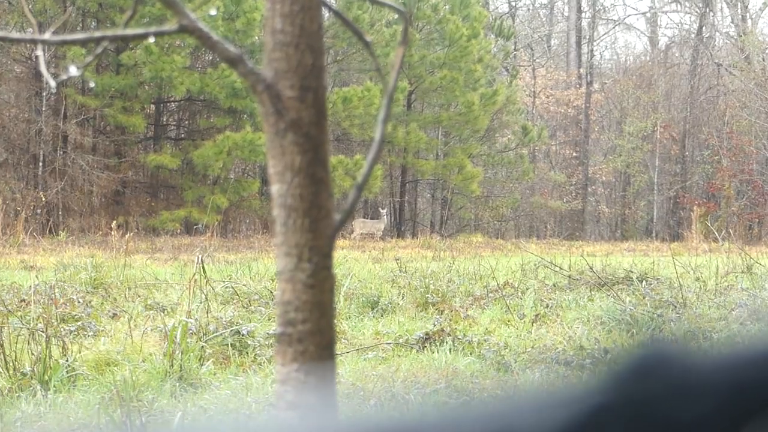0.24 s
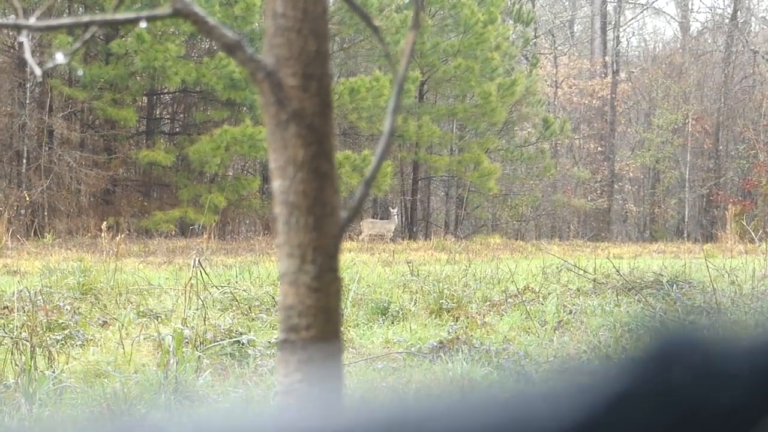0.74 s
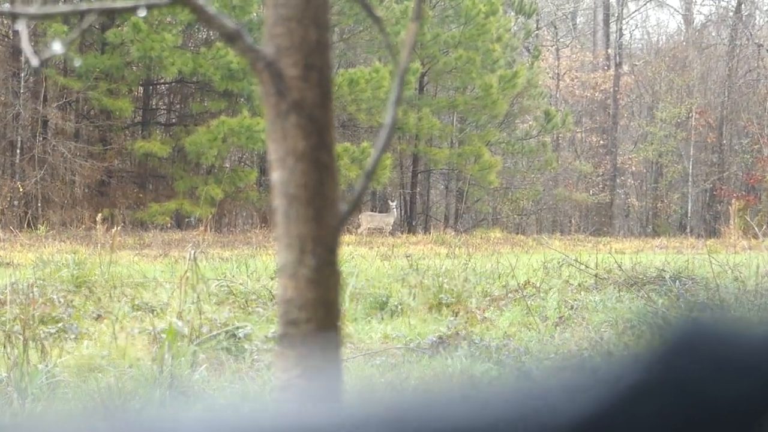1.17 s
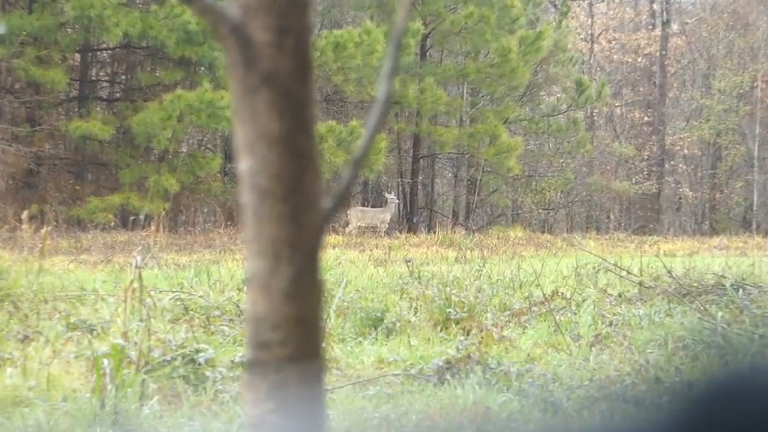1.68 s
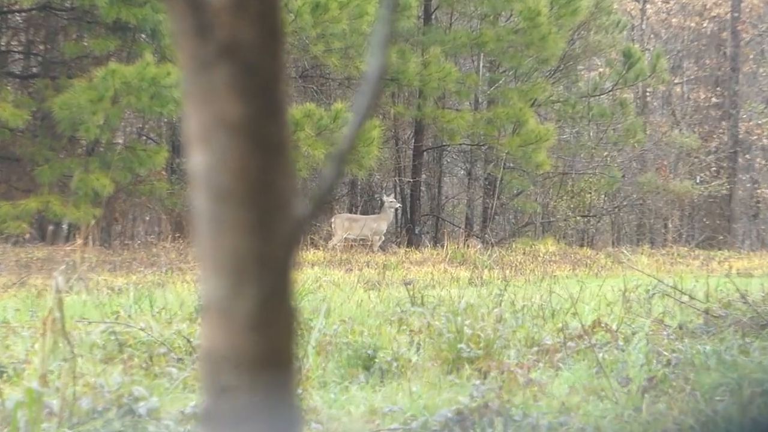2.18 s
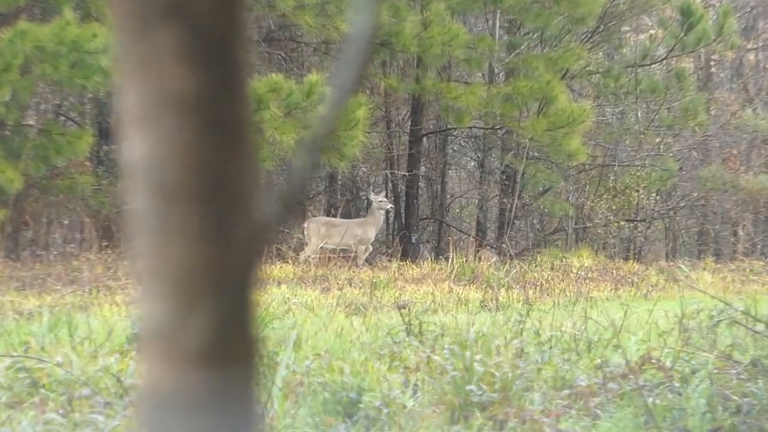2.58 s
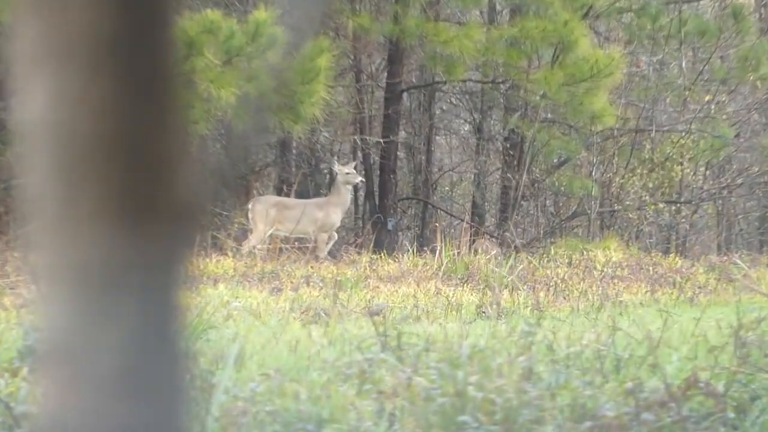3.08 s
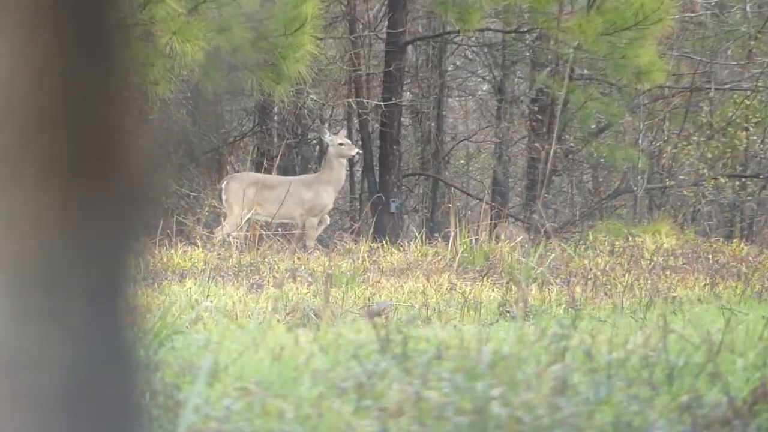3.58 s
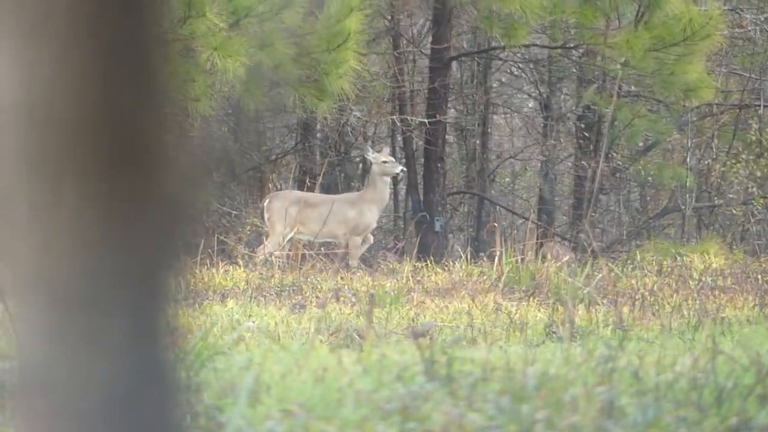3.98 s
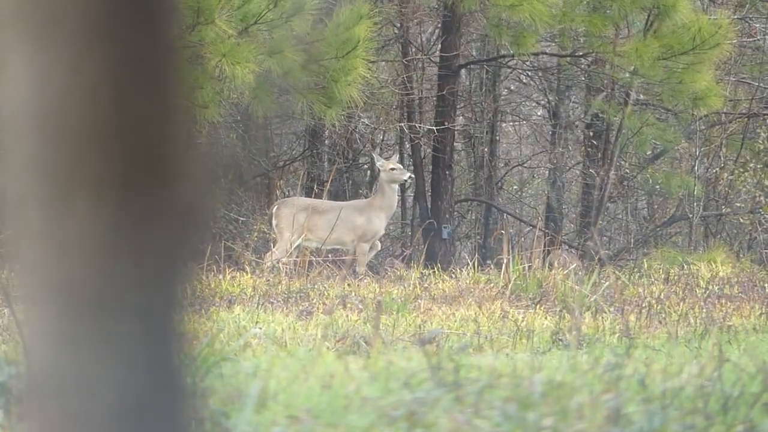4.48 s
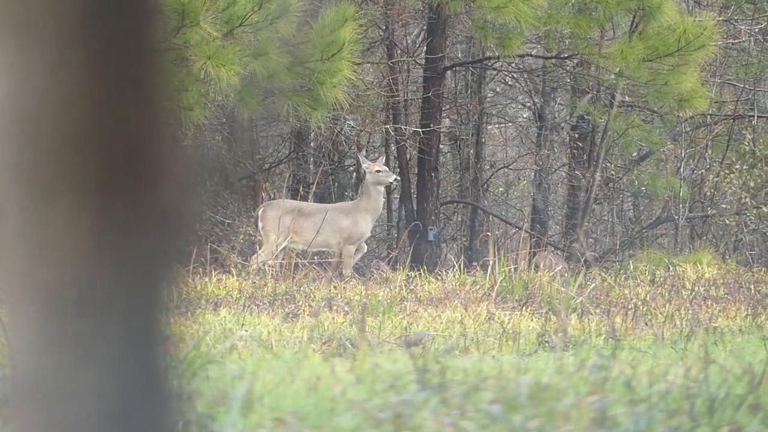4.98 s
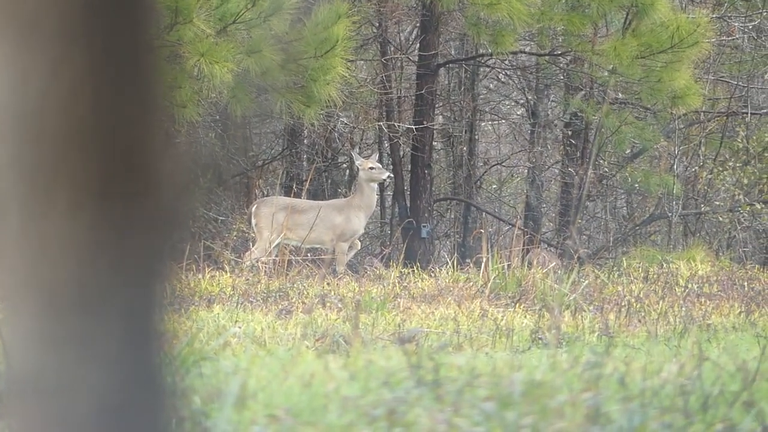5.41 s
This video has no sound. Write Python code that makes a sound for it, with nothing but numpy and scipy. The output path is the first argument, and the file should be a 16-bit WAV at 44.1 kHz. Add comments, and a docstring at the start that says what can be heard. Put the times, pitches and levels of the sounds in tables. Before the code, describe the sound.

From inside a small cloth hide, dull raindrop tocks cluster early then thin out over soft drizzle, with low wind thumps on the microphone.

```python
"""Raindrops knock on a small fabric shelter at the edge of a field, heard from inside.
Each drop flexes the taut cloth into a short falling 'tock' with a splash tick, and the cloth shivers after it.
Fine drizzle patters as filtered clicks, over shaped noise for the rain outside and its hiss on the grass.
A thin far-off trill is a narrow band of noise. Two spells of wind, made of gusts and single eddies,
buffet the microphone."""
import sys
import numpy as np
from scipy import signal
from scipy.fft import rfft, irfft, next_fast_len
from scipy.io import wavfile
from scipy.ndimage import uniform_filter1d

SR = 44100
rng = np.random.default_rng(int(sys.argv[2]) if len(sys.argv) > 2 else 0)


def dump(signal):
    """Clip the signal to [-1, 1] and save it as 16-bit WAV at the path in sys.argv[1]."""
    limited = np.clip(np.atleast_2d(signal).T, -1, 1)
    pcm = np.round(limited * 32767).astype(np.int16)
    wavfile.write(sys.argv[1], SR, pcm)


N = 249165
TIME = np.arange(N) / SR
# multiplies a sound that has opposite signs at the left and right ports
LEFT_RIGHT = np.array([[1], [-1]])

# level of the rain as heard, which dips in the wind and after loud blows, probably as the recorder
# turns itself down; before each layer's own gain: start_s, wash_db, fine_patter_db
RAIN_LEVEL = [(0.0, -43, -48), (0.77, -43.5, -48.5), (1.27, -42, -44), (1.41, -42, -43), (1.48, -42.5, -43),
              (1.7, -47.5, -48), (2.0, -45.5, -49), (2.16, -49.5, -49.5), (2.66, -48, -50),
              (3.15, -41.5, -47), (3.27, -45, -49), (3.52, -46.5, -50), (3.81, -44, -50),
              (4.11, -43.5, -46), (4.48, -42, -44), (5.0, -43, -45), (5.48, -42, -46), (5.65, -43, -46)]
# eddies that hit the microphone, before the gain of the buffets: middle_s, peak_db, pitch_hz
EDDIES = [(1.623, -12.5, 195), (1.634, -9.5, 254), (1.649, -16, 258), (1.732, -11, 151),
          (1.758, -16.5, 440), (1.8, -13.5, 153), (1.836, -15, 195), (1.935, -12.5, 242), (1.979, -9, 265),
          (2.039, -15.5, 335), (2.079, -9.5, 219), (2.131, -11, 215), (2.135, -12, 500),
          (2.329, -16.5, 231.6), (2.37, -23.5, 102), (2.406, -11.5, 186), (2.445, -12, 229),
          (2.465, -13, 197), (2.605, -18.5, 145), (2.699, -23.5, 168), (4.673, -21, 137),
          (4.705, -19.5, 142), (4.785, -11.5, 152), (4.802, -13.5, 227), (4.81, -12.5, 360),
          (4.876, -16.5, 184), (4.96, -15.5, 238), (5.075, -15.5, 220), (5.159, -17.5, 125)]


def amp(db):
    """Turn decibels into a gain."""
    return 10 ** (np.asarray(db) / 20)


def unit(x):
    """Scale to an average (rms) strength of 1."""
    return x / np.sqrt(np.mean(x ** 2))


def shape(points, hz):
    """Read the gain of a (Hz, dB) curve at the given frequencies."""
    point_hz, point_db = np.transpose(points)
    octave_like = np.log(np.maximum(hz, 1))
    return amp(np.interp(octave_like, np.log(point_hz), point_db))


def colour(x, points):
    """Filter a sound by a (Hz, dB) curve."""
    size = next_fast_len(N + 4096)
    gain = shape(points, np.fft.rfftfreq(size, 1 / SR))
    return irfft(rfft(x, size) * gain, size)[..., :N]


def resonance(f, hz, q):
    """Response of something that rings at one pitch and is damped; gain 1 at its centre."""
    s = 1j * f / hz
    return s / q / (s * s + s / q + 1)


def walk(rate):
    """Smooth random motion with a spread near 1, with about `rate` new values a second."""
    step = max(int(SR / rate), 1)
    stairs = np.repeat(rng.standard_normal(N // step + 1), step)
    return unit(uniform_filter1d(stairs, step)[:N])


def pair(side_db):
    """Stereo white noise: a shared middle of rms 1, plus a side part that makes it wide."""
    return rng.standard_normal(N) + amp(side_db) * LEFT_RIGHT * rng.standard_normal(N)


def even(x):
    """Level out the slow swells that noise has by chance."""
    window = 700  # samples
    return x / np.sqrt(uniform_filter1d(np.mean(x ** 2, axis=0), window))


def swell(event, depth_db):
    """Level in dB that rises, holds and falls; depth_db under its top at start and end, lower beyond."""
    start_s, rise_s, hold_s, fall_s, top_db = event
    before = 1 - (TIME - start_s) / rise_s
    after = (TIME - start_s - rise_s - hold_s) / fall_s
    away = np.maximum(before, after).clip(0)
    return top_db - depth_db * away ** 2


def add(out, sound, at):
    """Mix a stereo sound in at a time in seconds."""
    i = max(int(at * SR), 0)
    out[:, i:i + sound.shape[1]] += sound[:, :N - i]


def rain(wash_gain_db=3.5, hiss_db=-3, fine_db=-1.5):
    """The dull wash of wet woods and field, the hiss on the grass and the drizzle on the cloth."""
    # tone of the dull wash: pitch_hz, density_db (per Hz)
    wash_tone = [(30, -29), (70, -8.5), (150, 0.5), (300, 1), (550, 0.5), (850, -2), (1300, -9),
                 (2500, -22), (6000, -33), (16000, -28.5)]
    # tone of the hiss and the drizzle: pitch_hz, density_db (per Hz)
    hiss_tone = [(500, -28), (1300, 1.5), (2400, 7), (4200, -2.5), (6500, 1), (10000, -0.5), (15500, -3.5)]
    s, *columns = np.transpose(RAIN_LEVEL)
    wash_db, patter_db = (np.interp(TIME, s, column) for column in columns)
    flicker_db = 1.2 * walk(25)
    wash_level = amp(wash_db + wash_gain_db + 0.19 * walk(11))
    wash = unit(colour(pair(side_db=-5.0), wash_tone)) * wash_level
    hiss = unit(colour(pair(side_db=-6.5), hiss_tone)) * amp(patter_db + hiss_db + flicker_db)
    fine = unit(colour(drizzle(), hiss_tone)) * amp(patter_db + fine_db)
    return wash + hiss + fine


def drizzle(drops_per_s=260, scatter_db=7, click_t60=.008, rustle_db=-14, rustle_t60=0.23):
    """Countless tiny drops of uneven size, each a click with a brief rustle (t60: seconds to fall 60 dB)."""
    out = np.zeros((2, N))
    # the rustle is cut short after 1024 samples
    t = np.arange(1024) / SR
    patches_hz = np.geomspace(1300, 9000, 12)
    for hz in patches_hz:
        chance = rng.random(N)
        weight = np.minimum(rng.exponential(size=N), 2.6)
        falls = chance < drops_per_s / len(patches_hz) / SR
        hits = falls * amp(scatter_db * weight)
        mid, side = rng.standard_normal((2, len(t)))
        fade = amp(-60 * t / click_t60) + amp(rustle_db - 60 * t / rustle_t60)
        rustle = (mid + .5 * LEFT_RIGHT * side) * fade
        # each patch of cloth has its own pitch
        ring = resonance(np.fft.rfftfreq(len(t), 1 / SR), hz, 2.8)
        patch = irfft(rfft(rustle) * ring)
        out += signal.oaconvolve(hits[None], unit(patch) * np.sqrt(hz), axes=1)[:, :N]
    return out


def drops(gain_db=26, tick_db=-8, shiver_db=-1, soft=1.844, tick_hz=6000, lag_s=.0001,
          splash_t60=0.023, shiver_t60=0.048, bright_t60=0.08, side_db=-5):
    """Each blow sends a bending wave through the cloth; its reflections from the seams shiver on."""
    chirp_turns, seam_echo = .72, .42  # cycles of delay at the pitch; strength of the echo
    preroll_s, lead_s = .004, .0001  # room for sound ahead of the blow; small shift earlier
    out, size = np.zeros((2, N)), 4096
    f, t = np.fft.rfftfreq(size, 1 / SR), np.arange(size) / SR
    # the right port hears the body of the blow a little later
    ports = np.exp(1j * np.pi * LEFT_RIGHT * lag_s * f / (1 + (f / 2200) ** 4))
    lows = 1 / (1 + (f / 1800) ** 2)
    # light cloth radiates little deep bass
    radiation = (1j * f / (1j * f + 130)) ** 2

    def fading(noise, t60):
        """Spectrum of noise that falls by 60 dB in t60 seconds."""
        return rfft(unit(noise * amp(-60 * t / t60))) / np.sqrt(size)

    for at, db, hz, splash_db, tail_db, pan_db, q in blows():
        echo_s = rng.uniform(.0005, .0022)
        # a long-ringing spot gives a purer plink
        purity = resonance(f, hz, np.clip(q - 1.5, 1e-3, 1))
        softness = 1 + 1j * f / (soft * hz)
        body = amp(db) * resonance(f, hz, q) * purity / softness * np.sqrt(1000 * q / hz)
        tick = amp(splash_db + tick_db) * resonance(f, tick_hz, 1.92)
        # bending waves are slower at low pitch, so the pulse chirps downwards
        chirp = np.exp(-2j * np.pi * chirp_turns * np.sqrt(f / hz))
        # the nearest seam echoes at once and gives each blow its own colour
        echo = seam_echo * f / (f + hz) * np.exp(-2j * np.pi * f * echo_s)
        travel = chirp * ports * (1 + echo)
        mid, side = rng.standard_normal((2, size))
        scatter = mid + amp(side_db) * LEFT_RIGHT * side
        # a few strong reflections stand out among many weak ones
        strength = np.repeat(amp(6.5 * rng.standard_normal(size // 32).clip(-2, 2)), 32)
        # reflections need a moment to come back
        returns = scatter * strength * np.clip(t / 0.0017 - .3, 0, 1)
        spray = fading(scatter, splash_t60)
        low_tail = lows * fading(returns, shiver_t60)
        high_tail = (1 - lows) * fading(returns, bright_t60)
        shiver = amp(tail_db + shiver_db) * chirp * (low_tail + high_tail)
        splash = tick * (travel + spray) / np.sqrt(2)
        wave = (body * travel + splash + (body + tick) * shiver) * radiation
        sound = np.roll(irfft(wave), int(preroll_s * SR), axis=1)
        add(out, sound * amp(gain_db + LEFT_RIGHT * pan_db / 2), at - preroll_s - lead_s)
    return out


def blows():
    """All single blows on the cloth, as rows of the columns below plus the sharpness of resonance (Q)."""
    # Levels stand before the gains in drops(); shiver is relative to the blow.
    # drops that knock: time_s, level_db, pitch_hz, splash_tick_db, shiver_db, left_minus_right_db
    knocks = [(0.0141, -21, 1780, -35, 7.5, 6), (0.3346, -3.5, 800, -18.5, -1, -1),
              (0.9049, -12.5, 780, -24.5, 4, -1), (1.0063, -3.5, 450, -17.5, -3, 4.5),
              (1.0521, 3, 420, -18, -8.5, 2), (1.116, -17.5, 720, -30, 8, 7),
              (1.1258, -4, 560, -30, -3, 3.5), (1.1746, 1.5, 407, -18.5, -11, 2),
              (1.221, -10, 500, -29, 1.5, 1), (1.2479, -3.5, 530, -20, -2.5, 0.5),
              (1.391, -13.5, 1090, -29, -16, 0), (1.4281, -2, 368, -19.5, 0.5, 1),
              (1.5277, -8, 460, -22.5, 1.5, 2), (1.5465, 2, 444, -18, -6, 2),
              (1.567, -17.5, 660, -28, 7, 3), (1.573, -3, 555, -30, -8.5, 3.5),
              (1.5982, -4, 740, -27, -3, 5), (1.6276, -8.5, 1110, -21, -10, 3),
              (1.7536, -18, 1290, -34, 5.5, 5.5), (1.895, -11.5, 2300, -29, -1.5, 0.5),
              (1.9617, -15, 1150, -30, -10, -5), (2.7924, -20, 1600, -24.5, -5, 1),
              (2.8485, -28.5, 1550, -28, 3.5, 2), (3.2754, 2, 570, -15.5, -8.5, 0),
              (3.4447, -11, 1090, -10, -8, 5.5), (3.4562, -5.5, 950, -48, -9, 4.5),
              (3.9435, -18.5, 1640, -21.5, -5, 7), (4.1218, -21.5, 2020, -20.5, -4, 4),
              (4.2524, -14, 2370, -12.5, -10, 1), (4.488, -13, 1080, -20.5, -1.5, -3),
              (4.5713, -20.5, 775, -38, -7, -8), (4.614, -25.5, 1640, -35, 4.5, -4),
              (4.7305, -19, 1240, -34, -14, -5), (4.9603, -26.5, 1000, -43, -10, 4),
              (5.452, -2, 740, -17.5, -11, -2), (5.5749, -22, 1140, -30.5, -1.5, 3)]
    # drips that ring with a clear pitch: time_s, level_db, pitch_hz, splash_tick_db, shiver_db
    plinks = [(2.1975, -18.5, 2470, -26, -2), (3.6235, -14, 2070, -26.5, -15),
              (4.7618, -17.5, 1810, -20, -1.5), (5.3533, -26, 3020, -26.5, -2)]
    cloth_q, plink_q = 0.61, 5.3
    knock_rows = [(*row, cloth_q) for row in knocks]
    plink_rows = [(*row, 0, plink_q) for row in plinks]  # 0: in the middle
    return knock_rows + plink_rows + small_drops()


def small_drops(count=50):
    """Random light drops on the cloth, louder and more frequent where the level of the patter is higher."""
    # (mean, spread) in dB; level and tick are over the fine patter, before the gains in drops()
    level_law, tick_law, pan_law = (17.5, 2), (9, 4.5), (1, 5)
    middle_hz, spread_octaves, q, shiver_db = 1650, 0.66, 0.81, 3
    s, _, patter_db = np.transpose(RAIN_LEVEL)
    fallen = np.cumsum(amp(np.interp(TIME, s, patter_db)) ** 2)
    times = np.interp(rng.random(count), fallen / fallen[-1], TIME)
    levels_db = np.interp(times, s, patter_db)
    chances = rng.standard_normal((count, 4)).clip(-2, 2)

    def vary(law, z):
        """Draw a value from a mean and a spread."""
        return law[0] + law[1] * z

    rows = []
    for at, db, (a, b, c, d) in zip(times, levels_db, chances):
        hz = middle_hz * 2 ** (spread_octaves * b)
        rows.append((at, db + vary(level_law, a), hz, db + vary(tick_law, c),
                     shiver_db, vary(pan_law, d), q))
    return rows


def trill(hz=4050, q=10, flicker_db=2):
    """A far-off trill, perhaps insects: many callers merge into one narrow band that swells and fades."""
    event = (0.4, 1.7, 2.1, 0.2, -63)  # start_s, rise_s, hold_s, fall_s, level_db
    ring = resonance(np.fft.rfftfreq(N, 1 / SR), hz, q) ** 2
    band = irfft(rfft(pair(side_db=-4)) * ring, N)
    return unit(band) * amp(swell(event, depth_db=3) + flicker_db * walk(27))


def wind(gain_db=-3, brighten=1.0, knee_hz=330, strong_db=-28):
    """Turbulence on the ports: a rumble that gets brighter and wider when it blows harder."""
    # tone of the wind: pitch_hz, density_db (per Hz), before the extra brightness
    wind_tone = [(25, -40), (45, -38), (80, -1), (130, 3), (210, 0.5), (300, -9), (450, -18.5), (700, -29),
                 (1100, -40), (2000, -69)]
    db = wind_level()
    rumble = even(colour(pair(side_db=-11.5), wind_tone))
    swirl = even(colour(pair(side_db=2.0), wind_tone))
    low = signal.butter(3, knee_hz, "low", fs=SR, output="sos")
    high = signal.butter(3, knee_hz, "high", fs=SR, output="sos")
    brightness = amp(9.5 + brighten * (db - strong_db))
    return amp(db + gain_db) * (signal.sosfilt(low, rumble) + signal.sosfilt(high, swirl) * brightness)


def wind_level(depth_db=29.5, flutter_db=3, flutter_per_s=30, wake_db=-14.5, wake_s=0.012):
    """Wind strength in dB: gusts rise, hold and fall with a flutter, and the air churns around each eddy."""
    # gusts, before the gain of the wind: start_s, rise_s, hold_s, fall_s, level_db
    gusts = [(1.494, 0.11, 0.096, 0.37, -29.5), (1.863, 0.1, 0.17, 0.25, -25.5),
             (2.325, 0.079, 0.034, 0.38, -30), (4.488, 0.23, .35, 0.36, -32.5)]
    calm = amp(-90) ** 2
    gust_power = sum(amp(swell(gust, depth_db)) ** 2 for gust in gusts)
    power = gust_power * amp(flutter_db * walk(flutter_per_s)) ** 2
    for at, db, _ in EDDIES:
        # wake_db is relative to the eddy's peak
        power = power + amp(db + wake_db) ** 2 * np.exp(-((TIME - at) / wake_s) ** 2)
    return 10 * np.log10(calm + power)


def buffets(gain_db=-2, side_db=-4, edge_db=-13, edge_rise=1.0, hard_db=-13, eddy_cycles=.6):
    """An eddy passes as one or two swings of pressure; a harder one has a sharper edge, its own on each port."""
    out, half_s = np.zeros((2, N)), .03
    t = np.arange(-half_s, half_s, 1 / SR)
    phases = 2 * np.pi * rng.random((len(EDDIES), 4))
    for (at, db, hz), phase in zip(EDDIES, phases):
        turn = 2 * np.pi * hz * t
        sideways = amp(side_db) * LEFT_RIGHT * np.cos(1.42 * turn + phase[1])
        swing = np.cos(turn + phase[0]) + sideways
        edge_level = amp(edge_db + edge_rise * (db - hard_db))
        edge = edge_level * np.cos(2.33 * turn + phase[2:, None])
        # swells and dies away evenly around the middle
        passing = 1 / np.cosh(t * hz / eddy_cycles * np.sqrt(2))
        add(out, amp(db + gain_db) * (swing + edge) * passing, at - half_s)
    return out


def scene():
    """Rain and trill as the two microphone ports hear them, with the wind directly on the ports."""
    # treble colour of the microphone: pitch_hz, gain_db
    mic_tone = [(2800, 0.5), (4600, 4.5), (6200, 0.5), (7700, -3.5), (9600, 0), (12000, -3), (15500, -6.5)]
    # difference between the two ports: pitch_hz, left_minus_right_db
    port_balance = [(60, -1), (200, -2.5), (400, -3), (750, -0.5), (1300, 1), (2400, 5), (4400, 3),
                    (8000, -1.5), (15000, -6)]
    sound = colour(drops() + rain() + trill(), mic_tone)
    # each port takes half of the difference
    left_tone = [(hz, db / 2) for hz, db in port_balance]
    right_tone = [(hz, -db / 2) for hz, db in port_balance]
    heard = np.array([colour(sound[0], left_tone), colour(sound[1], right_tone)])
    return heard + wind() + buffets()


def record(dry):
    """The camera flattens peaks beyond full scale, then cuts the deepest bass and the top."""
    low_cut = signal.butter(3, 36, "high", fs=SR, output="sos")
    high_cut = signal.ellip(8, .2, 70, 15500, fs=SR, output="sos")
    return signal.sosfilt(np.vstack([low_cut, high_cut]), np.clip(dry, -1, 1))


dry = scene()
out = record(dry)
dump(out)
```